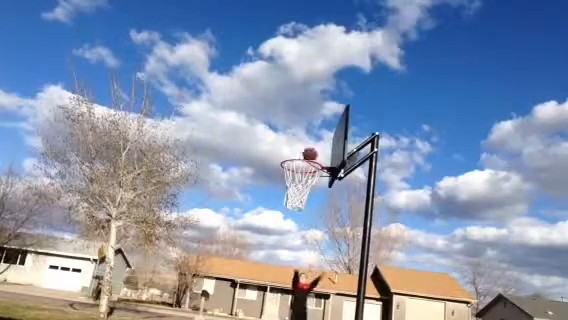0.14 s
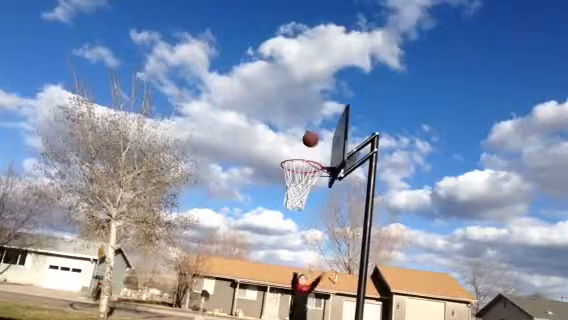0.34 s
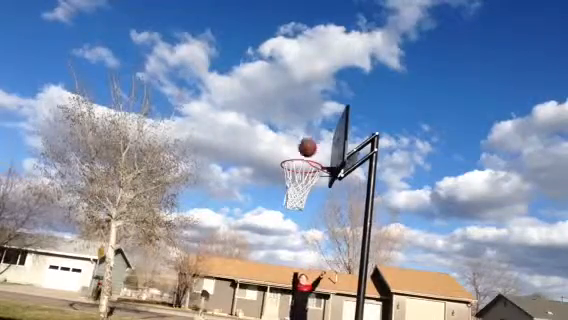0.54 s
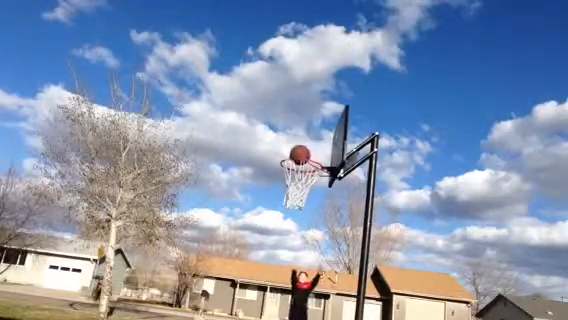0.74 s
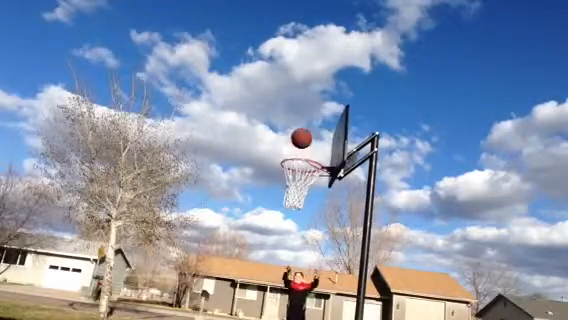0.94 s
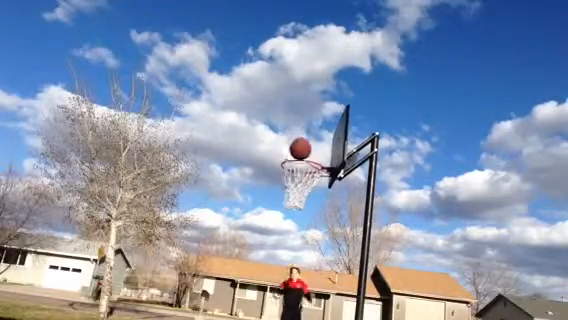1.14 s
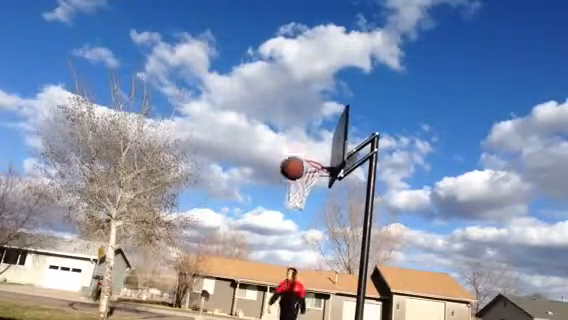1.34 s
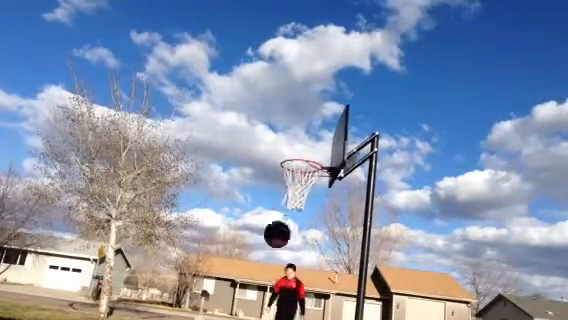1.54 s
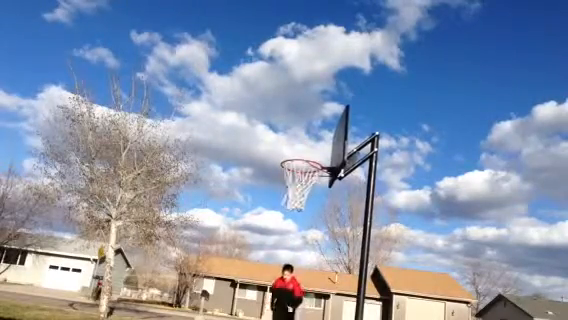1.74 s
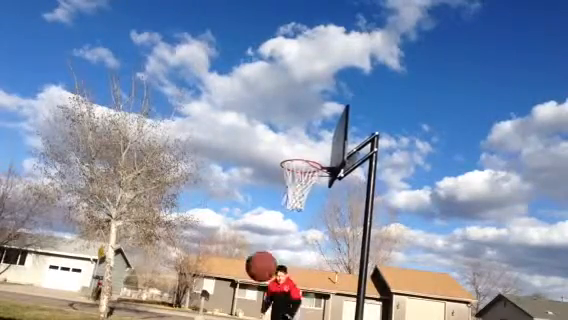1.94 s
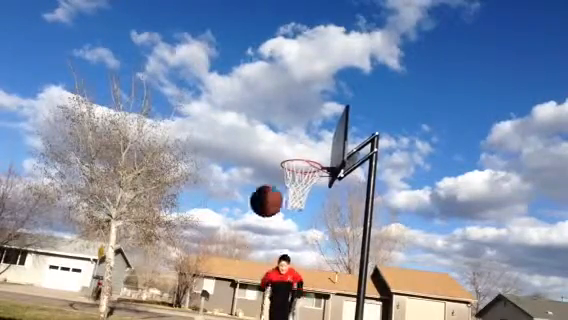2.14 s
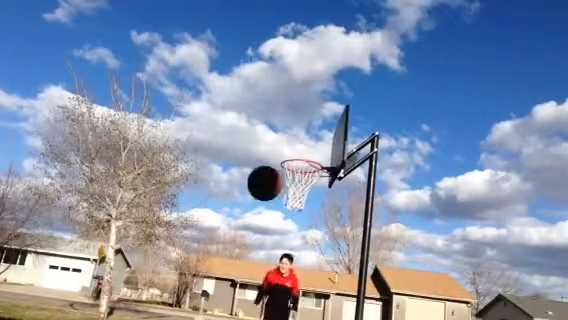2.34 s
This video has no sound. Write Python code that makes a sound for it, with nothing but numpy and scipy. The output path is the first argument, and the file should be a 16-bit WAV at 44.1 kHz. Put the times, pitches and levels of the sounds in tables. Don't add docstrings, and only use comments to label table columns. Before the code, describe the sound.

A basketball clangs on a rattling driveway hoop, then smacks once on concrete with yard echoes.

```python
import sys
import numpy as np
from scipy import signal
from scipy.fft import rfft, irfft
from scipy.io import wavfile

SR = 44100
rng = np.random.default_rng(int(sys.argv[2]) if len(sys.argv) > 2 else 0)


def amplitude_ratio(level_db):
    exponent = np.asarray(level_db, float) / 20
    return 10 ** exponent


def wrap_up_sound(samples):
    columns = np.atleast_2d(samples).T
    tamed = np.clip(columns, -1, 1)
    steps = np.round(tamed * 32767).astype(np.int16)
    wavfile.write(sys.argv[1], SR, steps)


N = 110250
TIME_S = np.arange(N) / SR
T60 = np.log(1000)


def noise(n=N):
    return rng.standard_normal(n)


def level(x, db):
    return x * amplitude_ratio(db) / np.sqrt(np.mean(x ** 2))


def ring(x, hz, t60):
    pole = np.exp(2j * np.pi * hz / SR - T60 / (max(t60, 0.003) * SR))
    return signal.lfilter([1], [1, -pole], x).imag


def colour(x, points):
    hz = np.fft.rfftfreq(len(x), 1 / SR) + 1
    point_hz, point_db = np.array(points, float).T
    gain = amplitude_ratio(np.interp(np.log(hz), np.log(point_hz), point_db))
    return irfft(rfft(x) * gain, len(x))


def low(x, hz, order=2):
    return signal.sosfilt(signal.butter(order, min(hz, 18000), fs=SR, output="sos"), x)


def swell(at, rise, t60):
    t = np.maximum(TIME_S - at, 0)
    return (1 - np.exp(-t / max(rise, 1e-4))) * np.exp(-T60 * t / t60)


def walk(rate_hz):
    return level(low(noise(), rate_hz), 0)


# (frequency [Hz], density [dB per Hz])
FLOOR = [(35, -24), (130, -8.5), (220, 0), (700, -5), (1100, -10), (1600, -14.5), (4000, -19.5),
         (15300, -20)]


def suburb():
    floor = level(colour(noise(), FLOOR), -62)
    bass = low(floor, 1200)
    waver_db = 1.0 * walk(4.8) + 0.5 * walk(25)
    return floor - bass + bass * amplitude_ratio(waver_db)


def tones(table, overtones_db, wobble, flutter_db, edge_s):
    out = np.zeros(N)
    clock = np.cumsum(1 + wobble * walk(37)) / SR
    flutter = amplitude_ratio(flutter_db * walk(135))
    for at, length, hz, db in table:
        rise = np.sin(np.pi / 2 * np.clip((TIME_S - at) / (2 * edge_s), 0, 1)) ** 2
        fall = np.exp(-T60 * np.maximum(TIME_S - at - length, 0) / (12 * edge_s))
        tone = np.zeros(N)
        for k, overtone_db in enumerate((0, *overtones_db), 1):
            if k * hz < 6600:
                tone += amplitude_ratio(overtone_db) * np.sin(2 * np.pi * k * hz * clock)
        out += amplitude_ratio(db) * np.sqrt(2) * rise * fall * tone
    return out * flutter


# (time [s], length [s], pitch [Hz], level [dB])
WHISTLES = [
    (1.992, .02, 2828, -66),
    (2.016, .092, 2828, -64),
    (2.135, .105, 2825, -66),
    (2.245, .022, 2825, -70),
    (2.305, .02, 2825, -74),
    (2.34, .05, 2825, -77),
    (2.035, .018, 4400, -75),
    (2.175, .04, 4400, -77),
    (2.05, .2, 3450, -80),
]


def whistles():
    return tones(WHISTLES, (), wobble=0.0021, flutter_db=1.1, edge_s=0.005)


# (delay [s], bass [dB], treble [dB], bright [dB], smear [s])
HOUSE_FRONTS = [(0.031, -23, -33.5, -30, 0.008), (.041, -21.5, -32.5, -30, 0.0095),
                (0.056, -28.5, -45, -37, 0.01), (0.079, -27.5, -38, -31, .007),
                (0.101, -31, -49.5, -56, 0.011), (0.119, -31.5, -49, -59, 0.012),
                (.128, -33.5, -53, -52, 0.0089), (0.137, -35, -59, -40, 0.01),
                (0.168, -37, -44, -52, 0.014), (0.196, -35.5, -43.5, -56, 0.016),
                (0.213, -37.5, -52.5, -67, 0.011), (.229, -41, -62, -50, 0.016),
                (0.259, -45, -53, -67, 0.016), (0.279, -47.5, -59, -49, 0.014)]


def yard(x):
    t = np.arange(int(0.7 * SR)) / SR
    tail = low(noise(len(t)), 2570, order=1) * np.exp(-T60 * t / 0.24) * (t > 0.006)
    response = amplitude_ratio(-34) * tail / np.sqrt(np.sum(tail ** 2))
    wall_loss_db = -4
    for lag, bass_db, treble_db, bright_db, smear in HOUSE_FRONTS:
        puff = noise(len(t)) * (t > lag) * np.exp(-np.maximum(t - lag, 0) / (smear * 0.92))
        puff = low(puff / np.sqrt(np.sum(puff ** 2)), 7000, order=1)
        click = 1.0 * (np.arange(len(t)) == int(lag * SR))
        below_bright = low(puff, 3780)
        treble = below_bright - low(below_bright, 900, order=1)
        response += amplitude_ratio(bass_db) * low(click, 365)
        response += amplitude_ratio(treble_db + wall_loss_db) * treble
        response += amplitude_ratio(bright_db) * (puff - below_bright)
    return signal.fftconvolve(x, 3 * response)[:N]


# (time [s], level [dB], knock pitch [Hz], fall t60 [s], grit [dB])
STEPS = [
    (0.0198, -41.5, 834, 0.019, -13),
    (0.03, -39, 900, 0.1, -4),
    (0.075, -67, 450, 0.046, -6),
    (0.512, -55.5, 300, 0.087, -44),
    (2.2344, -41.5, 1000, 0.014, -7),
    (2.243, -58.5, 4660, 0.023, -6),
    (0.059, -64, 1840, 0.58, -16),
    (2.376, -40, 290, 0.042, -13.5),
]


def shoes():
    out = np.zeros(N)
    grit = level(colour(noise(), [(900, 13), (2400, 1), (5500, -2.5), (7500, -69)]), 0)
    for at, db, hz, fall, grit_db in STEPS:
        knock = level(ring(ring(noise(), hz, 3.4 / hz), hz, 3.5 / hz), 0)
        sole = swell(at, 0.001, fall) * knock
        crunch = amplitude_ratio(grit_db) * swell(at + 0.0029, 0.0033, 2.05 * fall) * grit
        out += amplitude_ratio(db) * (sole + crunch)
    drag = colour(noise(), [(150, -10), (500, 0), (1530, -6), (4500, -12), (7000, -26)])
    return out + level(drag, -60.5) * swell(2.378, 0.0064, 6.6) * amplitude_ratio(2.0 * walk(40))


# (time [s], length [s], pitch [Hz], level [dB])
SQUEAKS = [(0.771, 0.018, 2387, -33), (0.804, 0.015, 2400, -51), (0.894, 0.0084, 5650, -45.5),
           (1.104, 0.013, 2078, -48), (1.126, 0.013, 2072, -48), (1.148, 0.0085, 2056, -49),
           (1.167, 0.018, 2081, -53.5), (1.2, 0.03, 2060, -61.5), (1.222, 0.025, 2075, -58),
           (1.255, 0.021, 5700, -65), (1.27, 0.015, 2071, -43), (1.292, 0.025, 2076, -47.5),
           (1.338, 0.02, 2077, -57), (1.362, 0.013, 2060, -60), (1.384, 0.015, 2068, -56.5),
           (1.435, 0.012, 2066, -57.5), (1.472, 0.021, 2068, -65), (1.51, 0.0055, 2240, -62.5),
           (1.706, 0.027, 2390, -67)]
# (level [dB], level [dB])
SQUEAK_OVERTONES = (-20, -24)


def hinges():
    return tones(SQUEAKS, SQUEAK_OVERTONES, wobble=0.004, flutter_db=2.5, edge_s=0.006)


# (frequency [Hz], level [dB], t60 [s])
HOOP_MODES = [(181, -7, 0.23), (233, -1.5, 0.22), (255.2, -1, 0.44), (370, -14, 0.56), (431.5, -3.5, 0.079),
              (469, -3, 0.21), (625, -0.5, 0.058), (790, -0.5, 0.08), (835, -1.5, 0.06), (926, -4, 0.05),
              (973, -10, 0.033), (1240, -11, 0.019), (1561, 0, 0.053), (1775, -5, 0.06)]


def hoop_modes(x):
    return sum(amplitude_ratio(db) * ring(x, hz, t60) / np.sqrt(t60) for hz, db, t60 in HOOP_MODES)


# (time [s], peak [dB], pitch [Hz])
KNOCKS = [(.7765, -26, 810), (.7885, -21.5, 840), (.7935, -24.5, 694), (.8015, -25, 900),
          (.8055, -20.5, 870), (.811, -22, 600), (.8175, -31, 650), (.8235, -21, 625), (.8335, -23.5, 620),
          (.8475, -22.5, 714), (.861, -29, 1030), (.882, -29.5, 520), (.895, -30, 1460), (.9035, -22, 1494),
          (.9085, -21.5, 930), (.913, -26, 781), (.9185, -25.5, 800), (.922, -20, 1380), (.9295, -19, 693),
          (.934, -18, 642), (.9415, -19.5, 700), (.952, -21, 590), (.956, -31, 910), (.968, -33, 623),
          (.979, -29.5, 580), (.998, -35, 452), (1.054, -35, 1830), (1.105, -45, 786), (1.115, -38, 795),
          (1.257, -42, 1250), (1.277, -41, 790), (1.295, -44, 1530), (1.47, -41, 400), (1.534, -50, 970),
          (1.55, -46, 1120)]


def bracket_knocks():
    notes, jolts = np.zeros(N), np.zeros(N)
    for at, db, hz in KNOCKS:
        tap = np.zeros(N)
        tap[int(at * SR)] = -amplitude_ratio(db)
        tap = low(tap, 2500)
        jolts += tap
        notes += amplitude_ratio(-2) * ring(tap, hz, 0.019)
    crack = amplitude_ratio(-18.5) * ring(jolts, 2480, 0.0094)
    board = hoop_modes(jolts)
    first_knock_db = KNOCKS[0][1]
    return notes + crack + amplitude_ratio(-10) * board * amplitude_ratio(first_knock_db) / np.abs(board).max()


def rim_hum():
    hum = np.sin(2 * np.pi * 1532 * TIME_S) * np.cos(np.pi * 5.5 * TIME_S)
    return amplitude_ratio(-59.5) * swell(0.75, 0.018, 5) * hum


# (frequency [Hz], density [dB per Hz])
SHEET = [(70, -50), (170, -20), (633, -3), (1560, -7), (2750, -11), (6100, -22), (7600, -34), (15000, -47)]
# (time [s], level [dB], rise [s], fall t60 [s], treble [dB])
RATTLES = [(0.756, -31, 0.002, 0.1, -6), (0.766, -32, 0.0015, 0.29, 6.5), (0.798, -31.5, 0.004, 0.4, 1),
           (0.878, -40, 0.014, 0.15, 11.5), (0.893, -30.5, 0.0094, 0.24, -3.5),
           (0.921, -34, 0.0058, 0.41, 3), (0.938, -40, .004, 0.19, 5), (0.969, -52.5, 0.033, 0.91, -3),
           (1.102, -49.5, 0.0028, 0.67, -2.5), (1.186, -52, 0.021, 0.4, 3),
           (1.253, -48.5, 0.0038, 0.75, -1.5), (1.349, -67, 0.0035, 0.16, 7),
           (1.464, -52, 0.0054, 0.17, -18), (1.531, -54.5, 0.0039, 0.43, 1.5)]


def hoop():
    clicks_per_s, click_spread_db = 1600, 2
    clicks = (rng.random(N) < clicks_per_s / SR) * noise()
    clicks = clicks * amplitude_ratio(click_spread_db * rng.exponential(size=N))
    clicks = level(clicks, 0) + 0.5 * noise()

    shake, bright = np.zeros(N), np.zeros(N)
    for at, db, rise, fall, treble_db in RATTLES:
        shake += amplitude_ratio(db) * swell(at, rise, fall)
        bright += amplitude_ratio(db + treble_db) * swell(at, rise, 0.85 * fall)
    shake = shake * amplitude_ratio(1.5 * walk(72))

    rung = hoop_modes(clicks * shake) * amplitude_ratio(-3) / np.std(hoop_modes(clicks))
    sheet = level(colour(0.16 * clicks + noise(), SHEET), -4.0)
    dull = low(sheet, 2740)
    hiss = dull * shake + (sheet - dull) * bright
    jingle = colour(clicks, [(7000, -20), (9400, 0), (12000, -6), (15000, -14)])
    jingle = jingle * amplitude_ratio(-43) * swell(0.767, 0.0026, 0.46)
    return bracket_knocks() + jingle + rung + hiss + rim_hum()


# (frequency [Hz], level [dB], t60 [s])
BALL_MODES = [(153, -12, 0.048), (245.3, 1, 0.1), (411, -5, 0.044), (490, -10, 0.027), (628.6, 0.5, 0.071),
              (807, -2, 0.12), (943.5, 1.5, 0.15), (1088, 0, 0.042), (1498, -7, 0.06), (1702, 6, 0.024),
              (1880, 0, 0.04), (2277, -3.5, 0.046), (2782, -3, 0.052), (4700, -10, 0.03)]
# (frequency [Hz], density [dB per Hz])
SLAP = [(88, -63), (150, 3), (505, -14.5), (636, -15), (1090, -7.5), (1230, -11), (2750, -18), (15000, -63)]
# (time [s], peak [dB], contact length [ms], slap [dB], slap top [Hz])
HITS = [
    (0.7545, -24.5, 0.49, -0.5, 1800),
    (1.8759, -5, 0.34, -8.5, 14700),
]


def contact(at, ms):
    return np.sin(np.pi * np.clip((TIME_S - at) / (ms / 1000), 0, 1)) ** 2


def ball():
    out = np.zeros(N)
    rebound_s, rebound_db = 0.00103, -5.5
    for at, db, ms, slap_db, top_hz in HITS:
        push = amplitude_ratio(rebound_db) * contact(at + rebound_s, ms) - contact(at, ms)
        body = sum(amplitude_ratio(mode_db) * ring(push, hz, t60) for hz, mode_db, t60 in BALL_MODES)
        slap = low(level(colour(noise(), SLAP), slap_db), top_hz)
        slap_fade = swell(at, 0.0002, 0.029) + amplitude_ratio(-15) * swell(at, 0.006, 0.21)
        hiss = low(noise(), top_hz)
        tick = amplitude_ratio(-32.5) * (hiss - low(hiss, 3500, order=1))
        tick_fade = swell(at, 0.00018, 0.013) + amplitude_ratio(-18) * swell(at, 0.0035, 0.38)
        out += amplitude_ratio(db) * (body / np.abs(body).max() + slap * slap_fade + tick * tick_fade)
    return out


def scene():
    bounce = ball()
    near = bounce + hoop() + shoes()
    squeaks = hinges()
    slap_edge = amplitude_ratio(5) * (bounce - low(bounce, 3780))
    echoes = yard(near + slap_edge + amplitude_ratio(-6) * squeaks)
    heard = near + squeaks + echoes
    heard = signal.sosfilt(signal.butter(4, 124.6, "high", fs=SR, output="sos"), heard)
    return (heard + whistles() + suburb())[None]


def roll_off(x):
    return signal.sosfilt(signal.butter(12, 15470, fs=SR, output="sos"), x)


def record(dry):
    cut = signal.sosfilt(signal.ellip(10, 0.2, 70, 15350, fs=SR, output="sos"), dry)
    return roll_off(cut)


dry = scene()
out = record(dry)
wrap_up_sound(out)
```